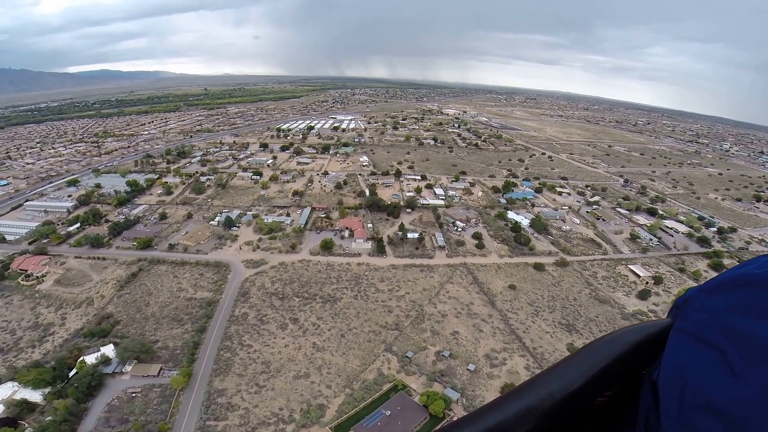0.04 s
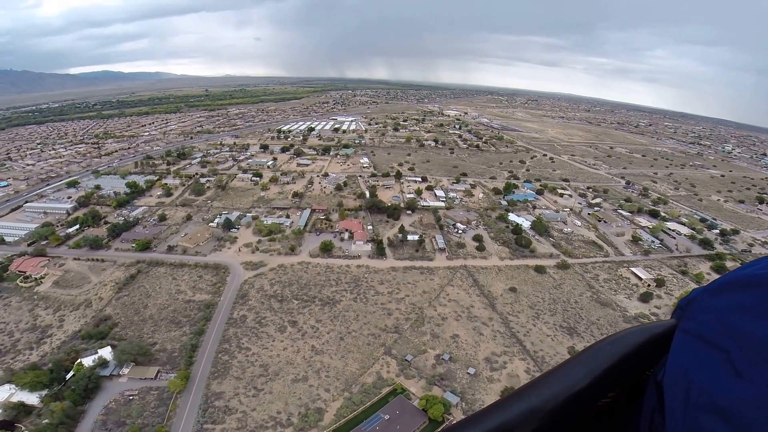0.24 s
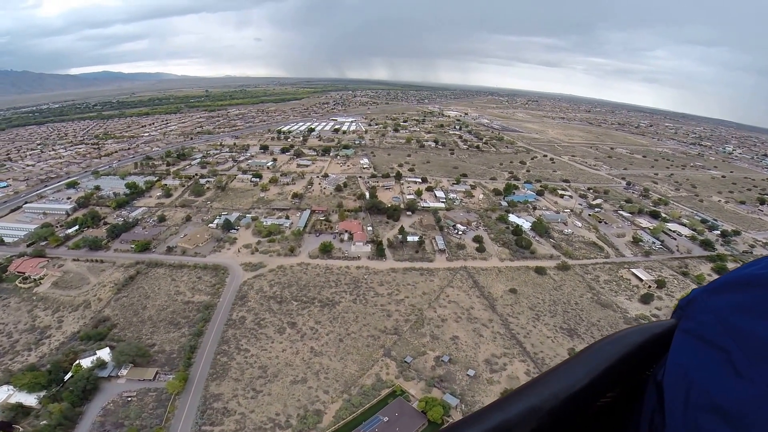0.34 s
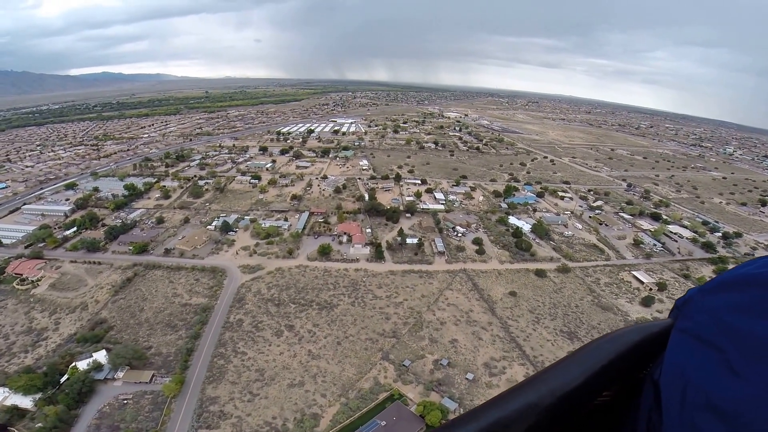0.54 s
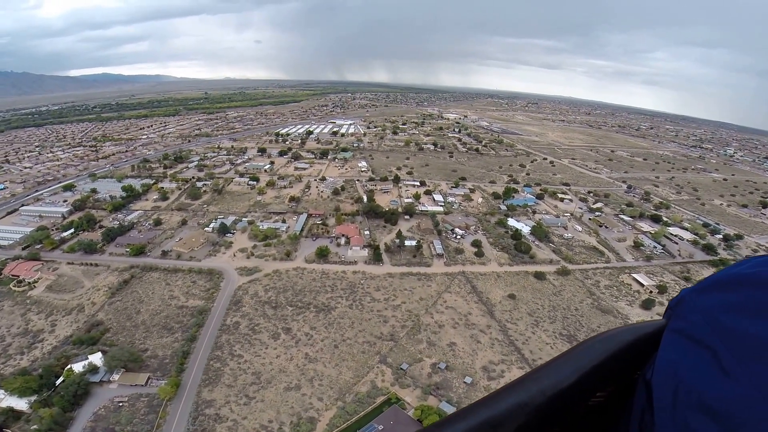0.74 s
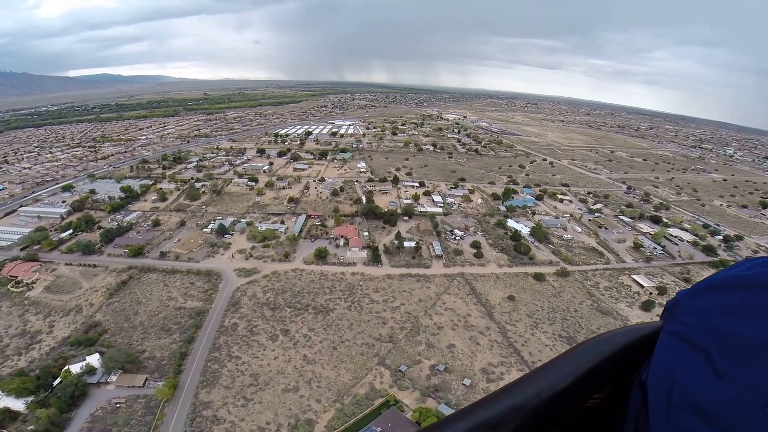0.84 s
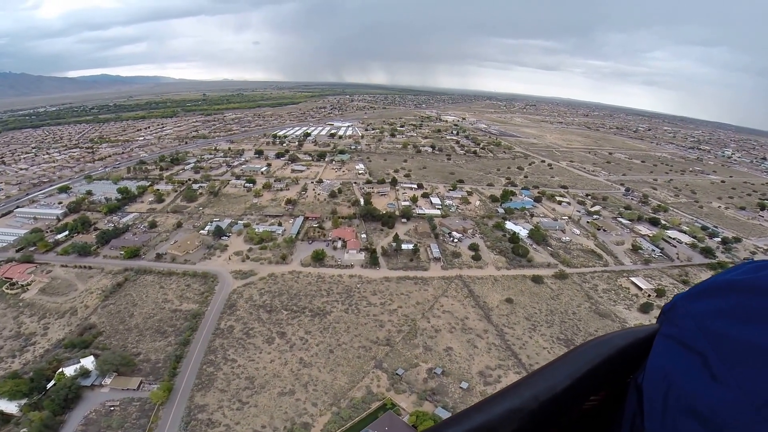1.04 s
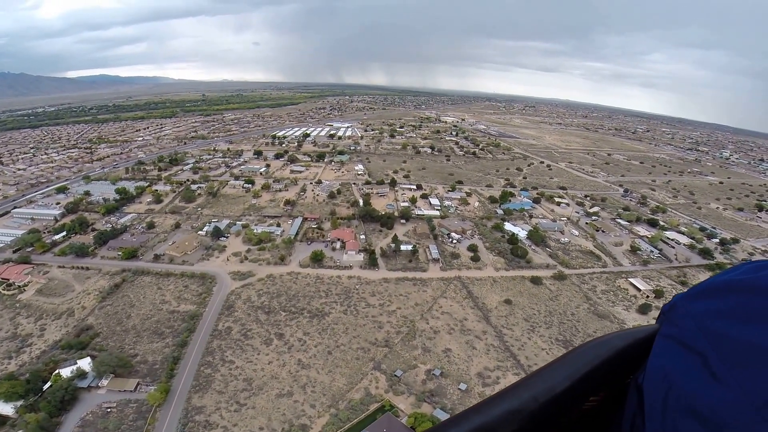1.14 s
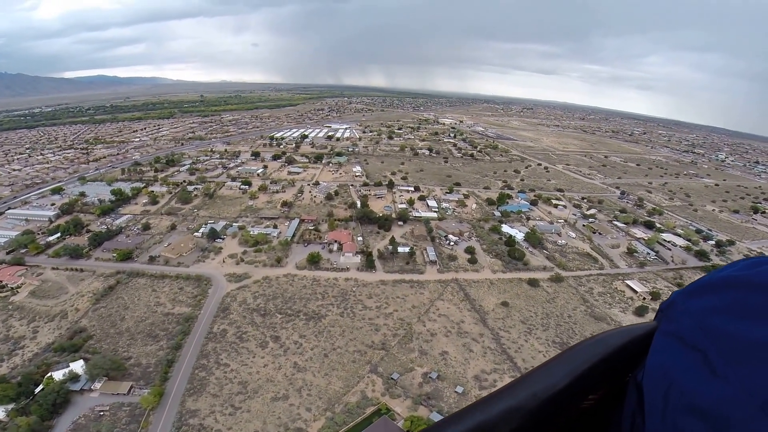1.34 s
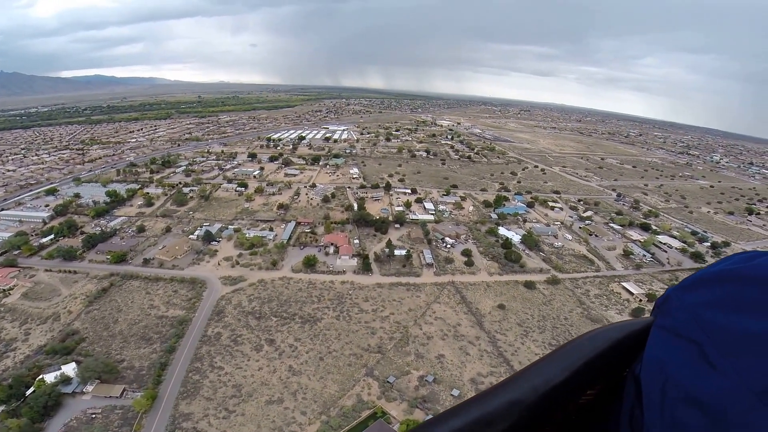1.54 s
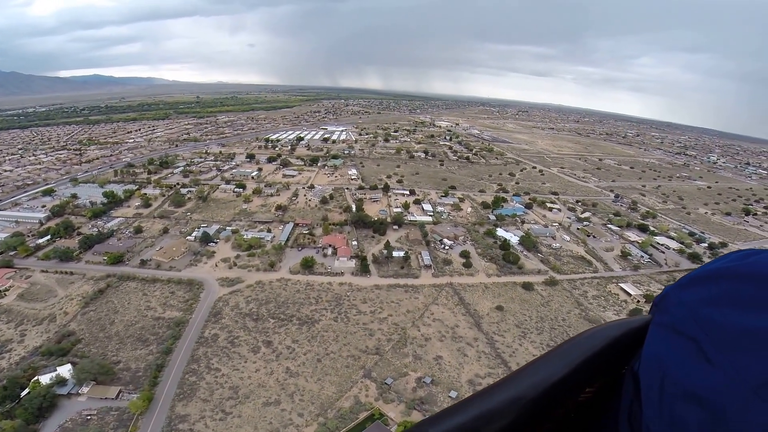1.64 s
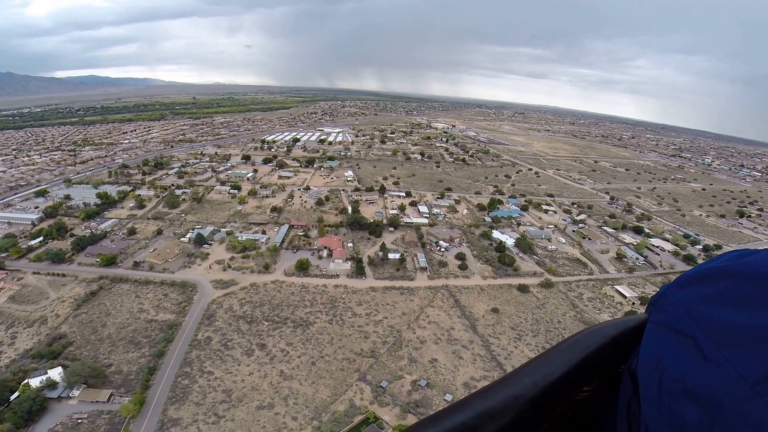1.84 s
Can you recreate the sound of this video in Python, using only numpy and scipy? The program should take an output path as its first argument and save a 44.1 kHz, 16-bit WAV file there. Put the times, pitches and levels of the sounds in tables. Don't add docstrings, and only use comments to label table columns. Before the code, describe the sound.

Quiet far-off rumble, then a sudden thump and a loud, billowing flame roar with bright gas hiss; the valve shuts quickly and low rumble creeps back with very faint bird notes, heard from a balloon basket outdoors.

```python
import sys
import numpy as np
from scipy import signal
from scipy.io import wavfile

SR = 44100
rng = np.random.default_rng(int(sys.argv[2]) if len(sys.argv) > 2 else 0)


def rack_gain(trim_db):
    fader = np.asarray(trim_db, float)
    return 10 ** (fader / 20)


def wav_out(sig):
    wavfile.write(sys.argv[1], SR, np.round(np.clip(np.atleast_2d(sig).T, -1, 1) * 32767).astype(np.int16))


N = 83790
T_S = np.arange(N) / SR


def rms_one(x):
    return x / np.sqrt(np.mean(x ** 2) + 1e-20)


def at_hz(spectrum, hz):
    f, db = np.transpose(spectrum)
    octaves_outside = max(np.log2(f[0] / hz), np.log2(hz / f[-1]), 0)
    return np.interp(np.log(hz), np.log(f), db) - 24 * octaves_outside


def drift(rate_hz):
    hop, run_in = 40, 2000
    r = np.exp(-2 * np.pi * rate_hz * hop / SR)
    noise = rng.standard_normal(N // hop + run_in + 2)
    slow = rms_one(signal.lfilter([1], [1, -2 * r, r * r], noise)[run_in:])
    return np.interp(np.arange(N) / hop, np.arange(len(slow)), slow)


def resonance(x, hz, width_hz):
    r = np.exp(-np.pi * width_hz / SR)
    gain = (1 - r * r) / 2
    return signal.lfilter([gain, 0, -gain], [1, -2 * r * np.cos(2 * np.pi * hz / SR), r * r], x)


def swell(start_s, length_s):
    return np.exp(-0.5 * ((T_S - start_s) / length_s) ** 2)


def banded(sources, spectrum, shared_db, own_db, tilt_db=0):
    run_in = 9000
    sources = [np.concatenate([x[-run_in:], x]) for x in sources]
    edges_hz = 20 * 2 ** np.arange(0, 9.8, 1 / 3)
    out = 0
    for k, (low, high) in enumerate(zip(edges_hz, edges_hz[1:])):
        hz = np.sqrt(low * high)
        sos = signal.butter(2, [low, high], "band", fs=SR, output="sos")
        band = signal.sosfilt(sos, sources[k % 2])[run_in:]
        flicker_db = shared_db + own_db * drift(7)
        out = out + band * rack_gain(at_hz(spectrum, hz) + flicker_db + tilt_db * np.log2(hz / 250))
    return rms_one(out)


# time in seconds, jet level in dB, roar level in dB.
VALVE_FLOW = [(.17, -76, -60), (.2, -63, -42), (.22, -43, -20.5), (.245, -38.5, -23.5), (.275, -34, -14.5),
              (.4, -32.5, -11.5), (.5, -31, -12.5), (.62, -31.5, -13), (.67, -34, -14.5), (.82, -36, -15.5),
              (.95, -35, -14), (1.12, -36, -14.5), (1.26, -39.5, -16.5), (1.39, -42.5, -19),
              (1.448, -49, -19), (1.51, -64.5, -36), (1.56, -68, -50.5), (1.62, -80, -52)]


def blast():
    s, jet_db, roar_db = np.transpose(VALVE_FLOW)
    outside_s = np.maximum(s[0] - T_S, 0) + np.maximum(T_S - s[-1], 0)
    shut_db = -150 * outside_s
    return np.interp(T_S, s, jet_db) + shut_db, np.interp(T_S, s, roar_db) + shut_db


# frequency in Hz, level in dB per Hz.
ROAR_SPECTRUM = [(13, -43), (22, -6), (85, -5), (141, 0), (222, -2.5), (280, -0.5), (337, -14), (374, -3.5),
                 (3200, -36.5), (4160, -59), (7040, -120)]
# frequency in Hz, width in Hz, level in dB over the plain roar.
CAN_RESONANCES = [(143, 19, -3.5), (183.7, 20, -2.5), (291.3, 42, 0.5), (373.5, 24, 4), (557, 24, -4),
                  (890, 200, -6.5)]
EDDIES_PER_S, EDDY_SPREAD_DB = 3000, 2.5
TILT_DB_PER_OCT = -0.0188


def roar(jet_db, roar_db):
    sizes = rack_gain(EDDY_SPREAD_DB * np.minimum(rng.exponential(1, N), 5)) * rng.choice([-1, 1], N)
    burning = rng.random(N) < EDDIES_PER_S / SR
    eddies = rms_one(sizes * burning) + 0.59 * rng.standard_normal(N)
    tilt_db = TILT_DB_PER_OCT * np.clip(jet_db + 68, -10, 8)
    plain = banded([eddies, -eddies], ROAR_SPECTRUM, 0.56 * drift(42), own_db=0.72, tilt_db=tilt_db)
    ringing = sum(rack_gain(db) * resonance(plain, hz, width_hz) for hz, width_hz, db in CAN_RESONANCES)
    return rack_gain(roar_db) * rms_one(plain + ringing)


# time in seconds, level in dB, frequency in Hz, length in seconds.
FLAME_BILLOWS = [(.345, -19.5, 57.6, 0.017), (.40, -12, 142.6, 0.028), (.58, -13.5, 147, 0.011),
                 (.64, -11.5, 156, 0.013), (.745, -17.5, 116, 0.014), (1.05, -9.5, 147.5, 0.017),
                 (1.12, -11, 143, 0.018), (1.24, -13.5, 165, 0.019), (1.789, -33, 106, 0.01)]


def billows():
    out = 0
    for s, db, hz, length_s in FLAME_BILLOWS:
        phase = rng.uniform(0, 2 * np.pi)
        out = out + rack_gain(db) * swell(s, length_s) * np.sin(2 * np.pi * hz * (T_S - s) + phase)
    return out


# frequency in Hz, level in dB per Hz.
JET_SPECTRUM = [(1470, 1), (2500, -9), (3090, -8.5), (3400, -4), (7910, -5.5), (13300, -11), (15100, -11)]
WHISTLE_HZ, WHISTLE_WIDTH_HZ, WHISTLE_DB = 3380, 74, -18


def jet(jet_db):
    flutter_db = 0.27 * drift(6.5) + 0.68 * drift(32)
    hiss = banded(rng.standard_normal((2, N)), JET_SPECTRUM, flutter_db, own_db=-0.2)
    whistle = rng.standard_normal(N)
    for _ in range(2):
        whistle = resonance(whistle, WHISTLE_HZ, WHISTLE_WIDTH_HZ)
    return rack_gain(jet_db) * (hiss + rack_gain(WHISTLE_DB) * rms_one(whistle))


# time in seconds, level in dB, burn time in seconds.
GAS_POCKETS = [
    (.2148, -14, .0007),
    (.2219, 2, .00055),
    (.2266, 4.5, .0013),
    (.2332, -5, .0011),
]
THUMP_HZ, THUMP_T60_S, THUMP_DB, VENT_HZ = 52, 0.06, -6, 40


def ignition():
    push = sum(rack_gain(db) * swell(s, burn_s) for s, db, burn_s in GAS_POCKETS) + 1e-18
    vented = signal.lfilter(*signal.butter(1, VENT_HZ, "high", fs=SR), push)
    r = rack_gain(-60 / (THUMP_T60_S * SR))
    w = 2 * np.pi * THUMP_HZ / SR
    boom = w * signal.lfilter([1, -np.cos(w)], [1, -2 * r * np.cos(w), r * r], push)
    return vented + rack_gain(THUMP_DB) * boom


# frequency in Hz, level in dB per Hz.
TOWN_SPECTRUM = [(25, -12), (85, -0.5), (180, -6.5), (336, -12.5), (950, -13.5), (1950, -28.5),
                 (2600, -39.5), (15100, -53.5)]
TOWN_DB = -36
DUCK_DB, DUCK_UNTIL_S, RECOVER_DB_PER_S = 6, 1.614, 12.5


def town():
    recovered_db = RECOVER_DB_PER_S * np.maximum(T_S - DUCK_UNTIL_S, 0)
    onset = np.clip((T_S - 0.25) / 0.21, 0, 1)
    duck_db = np.clip(DUCK_DB - recovered_db, 0, None) * onset
    rumble = banded(rng.standard_normal((2, N)), TOWN_SPECTRUM, 1.0 * drift(17), own_db=0.2)
    return rack_gain(TOWN_DB - duck_db) * rumble


# time in seconds, level in dB, frequency in Hz, length in seconds.
BIRD_NOTES = [
    (1.832, -70, 3240, .008),
    (1.87, -68, 3900, .015),
    (1.89, -68, 3250, 0.0099),
]


def birds():
    white = rng.standard_normal(N)
    out = 0
    for s, db, hz, length_s in BIRD_NOTES:
        breath = rms_one(resonance(resonance(white, hz, 250), hz, 250))
        out = out + rack_gain(db) * swell(s, length_s) * breath
    return out


def scene():
    jet_db, roar_db = blast()
    burner = roar(jet_db, roar_db) + billows() + jet(jet_db) + ignition()
    return (burner + town() + birds())[None]


def band_limit(x):
    return signal.sosfilt(signal.butter(12, 15270, fs=SR, output="sos"), x)


MIC_CUT_HZ, TOP_HZ, CEILING = 20, 15700, 2


def record(dry):
    x = signal.sosfilt(signal.butter(2, MIC_CUT_HZ, "high", fs=SR, output="sos"), dry)
    rounded = CEILING * np.tanh(x / CEILING)
    mix = signal.sosfilt(signal.cheby2(12, 40, TOP_HZ + 300, fs=SR, output="sos"), rounded)
    return band_limit(mix)


dry = scene()
out = record(dry)
wav_out(out)
```